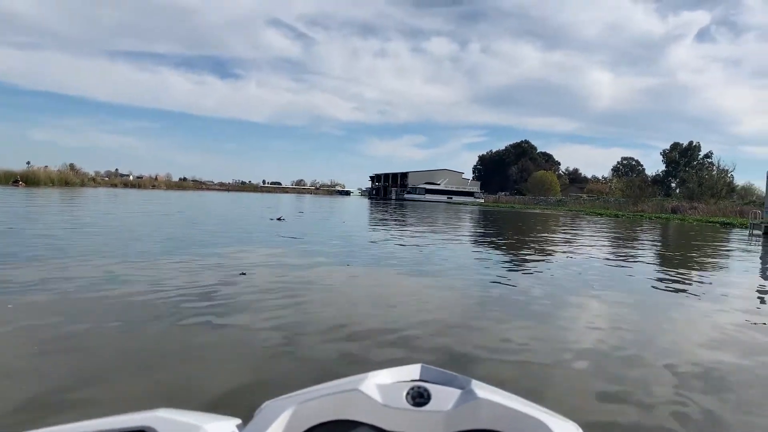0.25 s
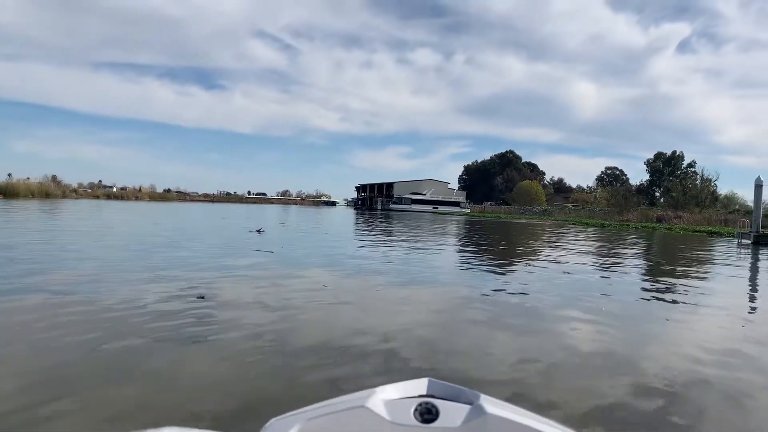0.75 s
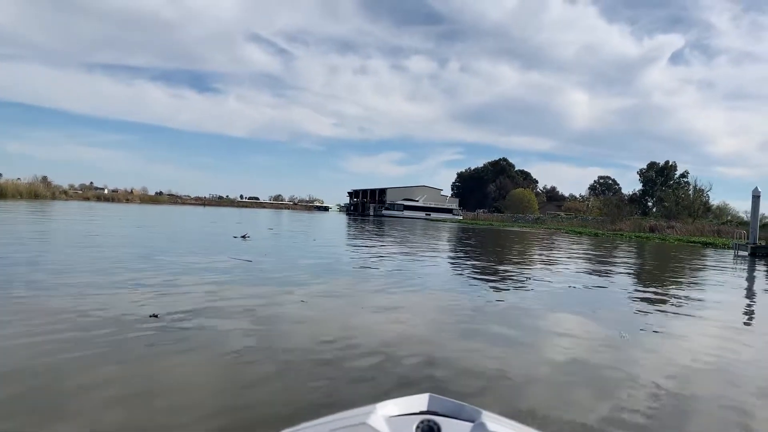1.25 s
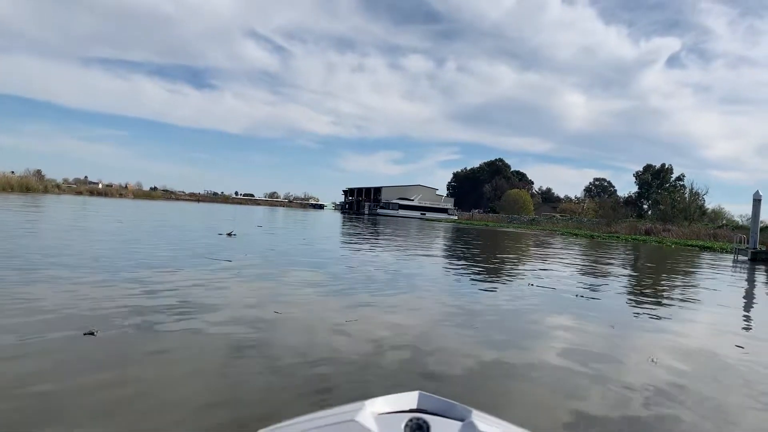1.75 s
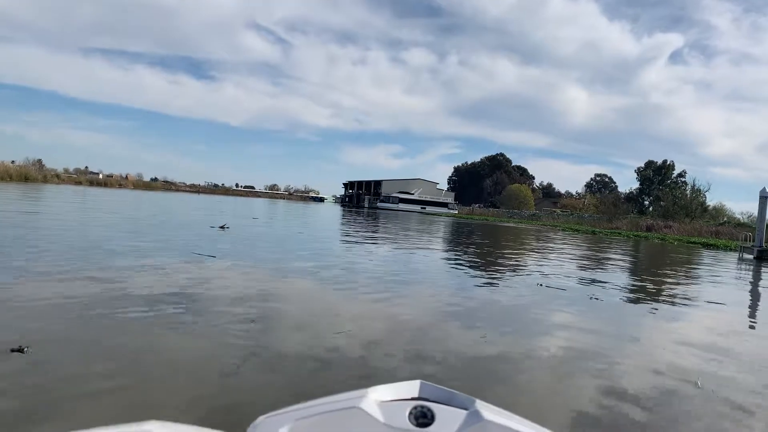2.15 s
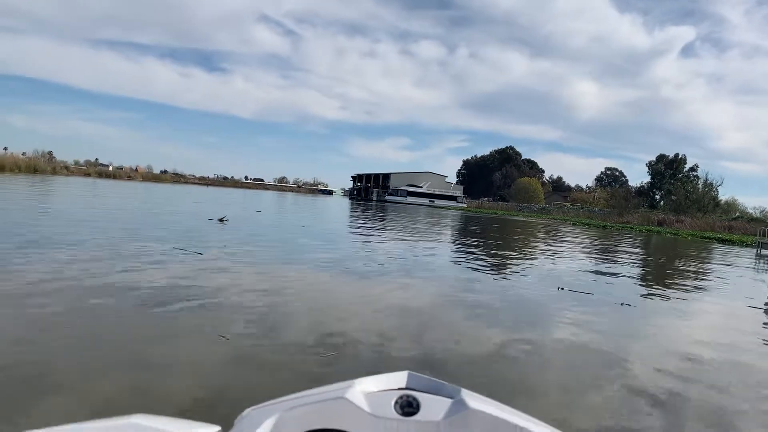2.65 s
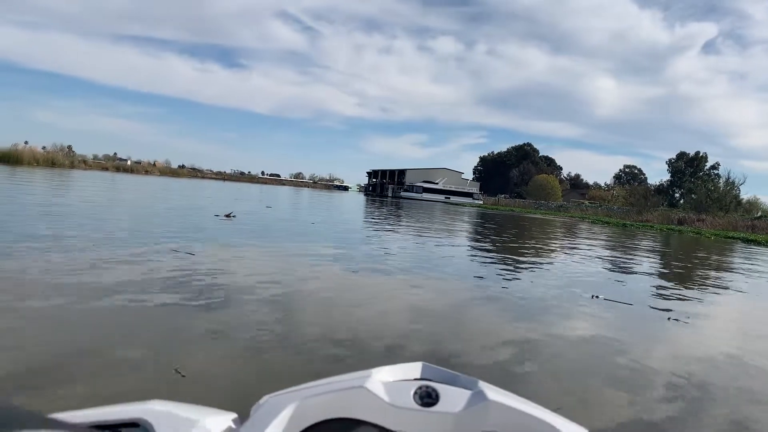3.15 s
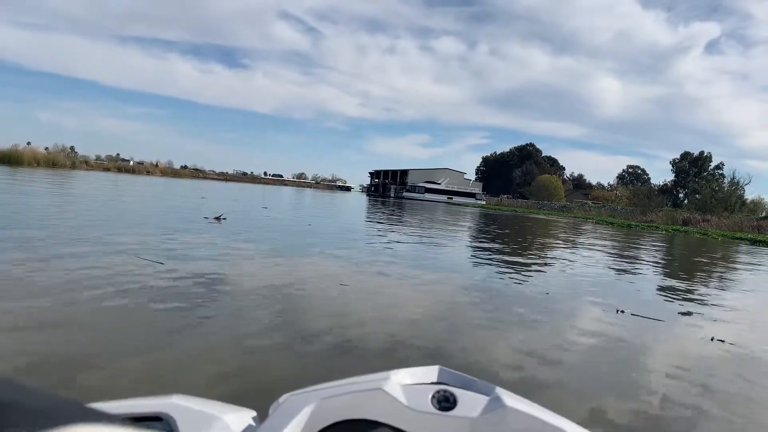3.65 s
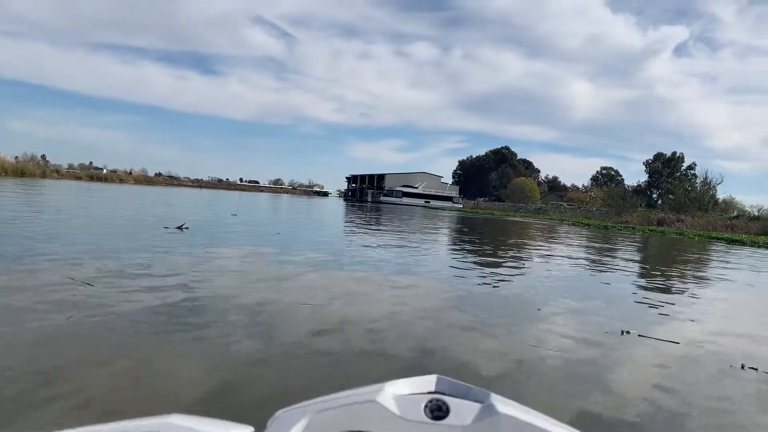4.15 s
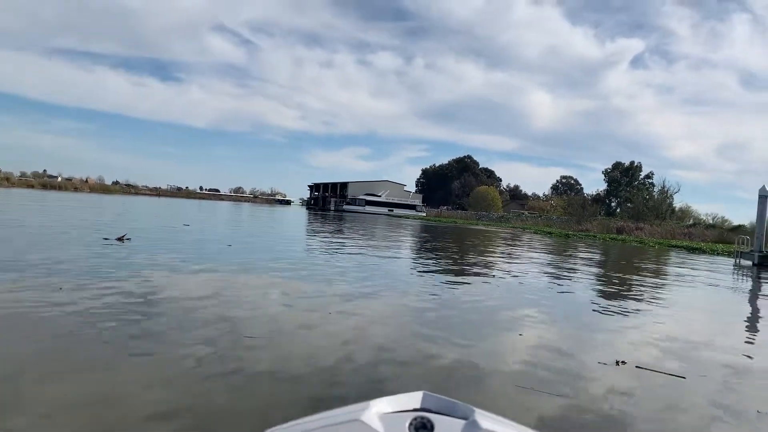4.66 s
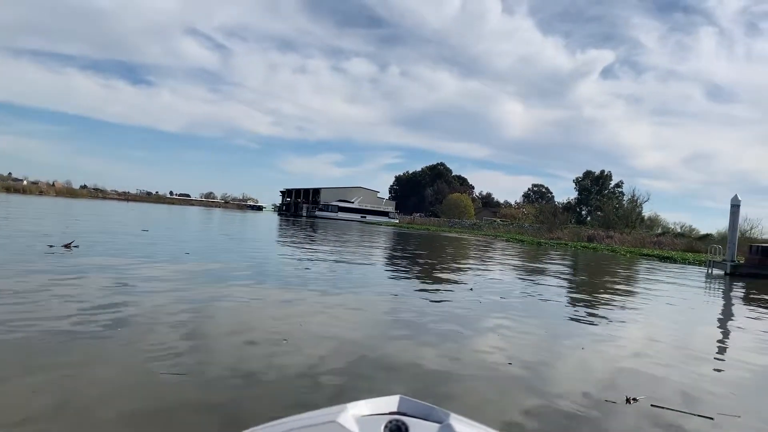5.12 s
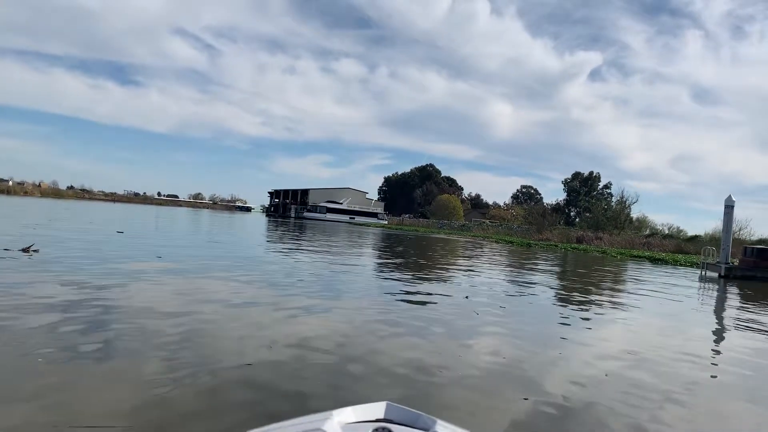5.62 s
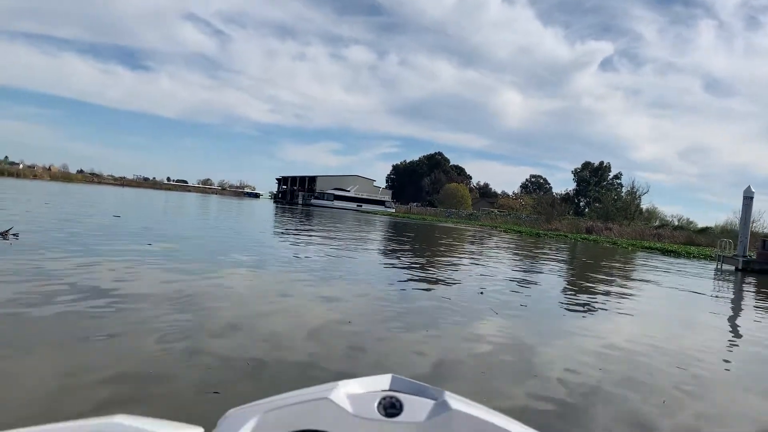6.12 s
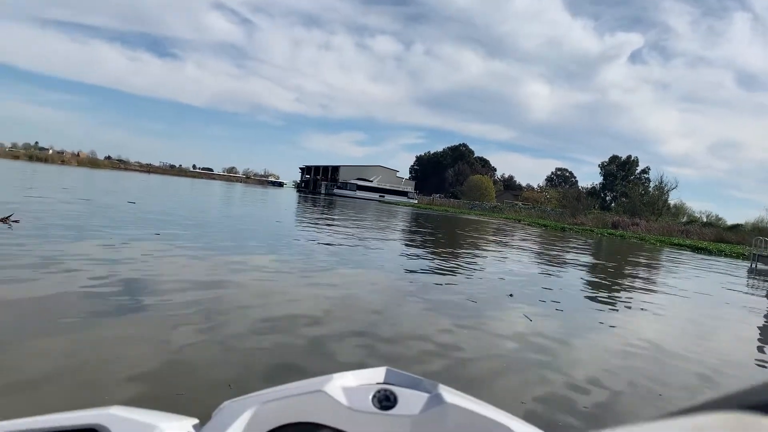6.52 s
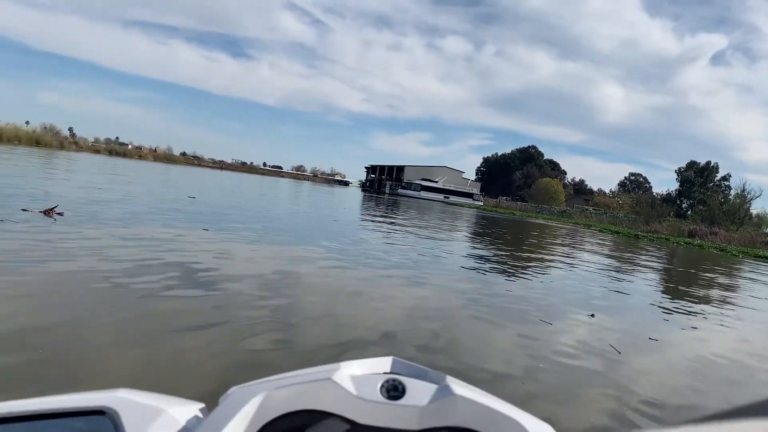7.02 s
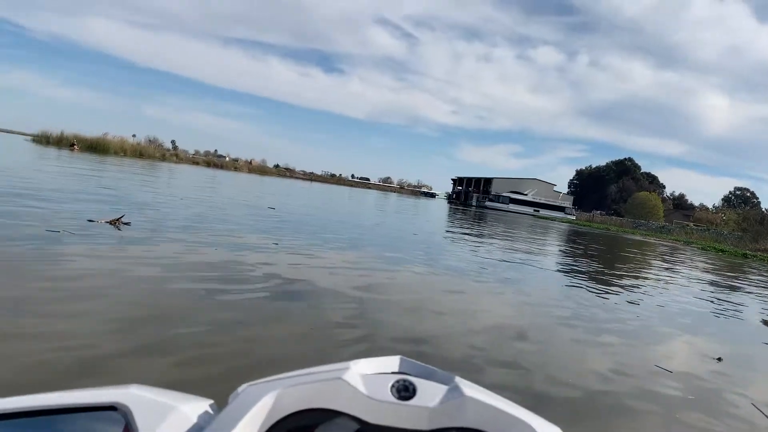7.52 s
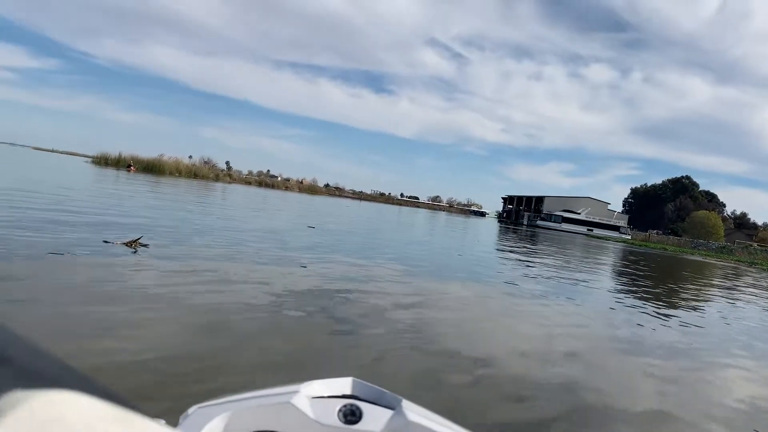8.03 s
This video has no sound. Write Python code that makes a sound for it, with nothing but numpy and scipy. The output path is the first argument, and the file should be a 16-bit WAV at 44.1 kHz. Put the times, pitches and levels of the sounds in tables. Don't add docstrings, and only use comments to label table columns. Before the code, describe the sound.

A small watercraft engine idles with a low, uneven, hollow boom and wet exhaust gurgle while water hisses and trickles along the hull.

```python
import sys
import numpy as np
from scipy import signal
from scipy.fft import rfft, irfft, next_fast_len
from scipy.io import wavfile
from scipy.ndimage import uniform_filter1d, map_coordinates

SR = 44100
rng = np.random.default_rng(int(sys.argv[2]) if len(sys.argv) > 2 else 0)


def persist_wave(psi):
    counts = np.round(np.clip(psi, -1, 1) * 32767).astype(np.int16)
    wavfile.write(sys.argv[1], SR, np.atleast_2d(counts).T)


def field_ratio(decibels):
    return 10 ** (np.asarray(decibels, dtype=float) / 20)


N = 365128

# (time [s], length [s], start pitch [Hz], end pitch [Hz], level [dB])
BIRD_PEEPS = [
    (4.785, 0.03, 5300, 5160, -50),
    (5.44, 0.027, 5280, 5125, -52),
    (7.576, 0.01, 3000, 3220, -44),
    (7.59, 0.03, 3237, 3080, -37.5),
]

# (frequency [Hz], density [dB per Hz])
WASH_COLOUR = [(300, -39), (500, 3), (1100, -3.5), (1500, -9.5), (1900, -11.5), (3000, -18), (6000, -25),
               (7800, -32), (8100, -26.5), (9500, -28), (10300, -32.5), (11500, -35.5), (13500, -41),
               (14300, -42.5), (15800, -44)]
# (time [s], level [dB])
WATER_FLOW = [(0.0, -41), (0.32, -44.5), (0.55, -41), (3.02, -41.5), (3.39, -42), (4.66, -41), (5.0, -42),
              (5.49, -40.5), (6.87, -43), (7.26, -40.5), (8.0, -42.5), (8.28, -39)]
# (time [s], half length [s], gain [dB])
SWASH_SWELLS = [
    (1.6, 0.32, 0.5),
    (3.3, .15, -0.5),
    (4.2, 0.16, -0.5),
    (6.4, .2, 1),
    (8.12, 0.14, -0.5),
]
# (time [s], half length [s], gain [dB])
SPRAY_LULLS = [
    (3.2, 0.34, -1),
    (5.75, 0.22, -3),
    (7.9, 0.44, -3),
]
# (time [s], length [s], start pitch [Hz], end pitch [Hz], level [dB])
HULL_SLAPS = [
    (5.67, 0.069, 275, 261, -14.5),
    (1.9, 0.084, 73, 55, -21),
]

# (time [s], peak level [dB], main mode [Hz])
SEAT_TAPS = [
    (1.068, -34, 2300),
    (2.3406, -35, 2500),
    (4.4715, -39, 5200),
    (4.4718, -37, 3300),
    (4.563, -42, 5270),
    (7.184, -40, 5200),
]

# (time [s], peak level [dB])
PANEL_TICKS = [(0.2942, -46), (0.3393, -51), (0.4687, -50.5), (0.5658, -45), (0.7262, -44.5), (0.8815, -37),
               (0.9133, -48), (1.1313, -43), (1.4065, -40), (1.511, -39), (1.748, -42.5), (1.8832, -39.5),
               (1.934, -42.5), (1.9699, -51), (1.989, -46.5), (2.0313, -43), (2.0916, -45.5), (2.1876, -43),
               (2.3819, -40), (2.5583, -46), (2.5975, -47), (2.8873, -44.5), (2.9277, -43), (3.7423, -46),
               (4.471, -30.5), (4.492, -36), (4.5096, -43), (4.5298, -39.5), (4.6895, -44.5), (4.9755, -41),
               (4.9824, -47.5), (4.9934, -49), (5.0113, -41), (5.3885, -49), (5.4365, -46), (5.6274, -46.5),
               (6.2153, -43), (6.2985, -45.5), (6.3593, -40), (6.4377, -45), (6.9964, -45.5), (7.0074, -44),
               (7.0503, -45.5), (7.0907, -42.5), (7.1544, -42.5), (7.218, -43), (7.272, -51.5),
               (7.2812, -44.5), (7.2923, -45), (7.3132, -43), (7.3454, -46), (7.4597, -52), (7.617, -49),
               (8.0472, -43.5), (8.1907, -44)]
# (time [s], peak level [dB])
CLIP_TICKS = [(0.6032, -46), (0.92, -47), (1.4073, -55.5), (1.8776, -53.5), (1.9883, -52), (2.558, -54.5),
              (2.5984, -49), (2.823, -51.5), (3.7914, -59.5), (3.8127, -38), (3.8326, -46), (3.8526, -33),
              (3.874, -36), (4.4702, -40), (4.92, -41), (4.9521, -50.5), (5.436, -44), (5.7817, -52.5),
              (6.298, -49), (6.3589, -48.5), (6.7849, -48.5), (6.997, -49), (7.0063, -45), (7.0498, -45),
              (7.154, -46), (7.1735, -59), (7.1861, -53), (7.2065, -48.5), (7.218, -46.5), (7.2284, -50),
              (7.2496, -45.5), (7.27, -49), (7.2809, -45.5), (7.2923, -42), (7.3142, -43), (7.335, -44),
              (7.3442, -47), (7.3574, -44), (7.525, -53.5), (7.618, -53), (7.709, -57), (8.038, -53),
              (8.1688, -49.5)]
# (frequency [Hz], level [dB], t60 [s], left over right [dB])
PANEL_MODES = [(2600, -11, .004, 0.5), (3900, -14, .004, -5), (5000, -11.5, 0.0044, -2.5),
               (6100, -11.5, 0.0055, 2), (8420, -7, 0.0082, 4.5), (9300, -3, 0.0054, 5),
               (12800, -18, .004, 2)]
CLIP_MODES = [(3300, -13.5, .004, 1.5), (4860, -14, .004, 4.5), (7300, -11.5, .004, -1.5),
              (9000, -7.5, .004, -7), (10600, -11.5, .004, -4.5), (11800, -5.5, .004, -1),
              (12900, -4, .004, -1), (13700, -4, .004, -1), (15000, -15, .003, -0.5)]

# (frequency [Hz], half width [Hz], level [dB rms])
INTAKE_BANDS = [(1350, 110, -57), (1130, 90, -57)]
# (time [s], half length [s], gain [dB])
INTAKE_SWELLS = [
    (.55, .3, 1),
    (1.75, .2, 5),
    (2.6, .15, 4),
    (3.35, .12, 10),
    (4.25, .3, 4),
    (5.7, .6, 5),
    (6.9, .3, 3),
]
# (frequency [Hz], level [dB rms], fade start [s])
WHINE_TONES = [(1115, -57.5, 8.5), (1678, -51.5, 5.6)]
# (time [s], half length [s], gain [dB])
WHINE_SWELLS = [(.1, .1, 1), (.45, .25, 1), (.85, .2, 3.5), (1.1, .08, -4), (1.4, .3, 4), (1.9, .3, 4),
                (2.25, 0.1, -4), (2.55, .2, 4), (2.9, .15, 6.5), (3.25, .12, 3), (3.6, .12, 4),
                (3.75, .06, -10), (4.1, 0.2, -4), (4.7, 0.44, 3.5), (5.3, .15, 2), (5.55, .12, -4),
                (5.95, 0.3, 4)]

# (frequency [Hz], density [dB per Hz])
HULL_COLOUR = [(13, -29.5), (22, -23), (58, -6), (107, -9.5), (193, -3), (243, -3.5), (392, -16),
               (467, -14.5), (555, -36.5), (700, -33), (910, -58), (1540, -120)]
# (time [s], half length [s], gain [dB])
OUTLET_DIPS = [
    (.4, 0.12, -0.5),
    (.9, 0.31, 4.5),
    (2.4, 1, 3),
    (3.4, 0.54, 1),
    (4.3, 0.87, 4.5),
    (5.8, 0.72, 4),
    (6.75, 0.2, 3.5),
    (7.8, 0.56, 4),
]

# (time [s], firing rate [Hz], load [dB], exhaust depth favouring order 4 over 5 [dB],
# hull shake [dB])
ENGINE_COURSE = [(0, 50.7, -15, -1.5, -21.5), (.25, 52.44, -24.5, -2.5, -24.5), (.55, 51.26, -19, 0.5, -20),
                 (1.0, 52.16, -24, 0.5, -23.5), (1.36, 50.98, -20, -2, -25), (2.0, 49.12, -17, -0.3, -27),
                 (2.9, 51.1, -21, -3, -22.5), (3.2, 49.62, -21, -3.5, -24.5), (3.85, 50.26, -22, 0, -24),
                 (4.13, 48.26, -21.5, 1, -22.5), (4.78, 50.55, -16.5, -1.5, -22),
                 (5.7, 46.3, -21, 2.5, -26), (5.9, 48.03, -20, 4, -27.5), (6.4, 47.24, -17, 0.5, -23.5),
                 (6.72, 48.66, -25, -4, -28), (7.05, 46.33, -18.5, 0, -22.5), (7.9, 48.84, -21, 2, -22),
                 (8.28, 46.92, -19.5, 0, -20.5)]
# (time [s], half length [s], rate change [Hz])
ENGINE_HUNTS = [(.75, .12, .4), (1.3, .08, -.5), (1.55, .12, .9), (1.68, .07, -.7), (1.85, .11, 1.1),
                (2.48, .3, -.8), (3.35, .1, .5), (5.45, .25, .7), (6.55, .1, -.5), (6.9, .12, -.8),
                (7.17, .15, 1), (7.55, .12, -.4), (8.14, .1, -.7)]
# (time [s], loss of order 4 [dB], loss of order 5 [dB])
STUMBLES = [(.21, -1, 8.5), (1.221, 16.5, -2), (1.93, 21, 3), (2.67, 13, 2), (2.79, 15.5, -1),
            (3.02, 8, -1.5), (3.359, 6.5, -1), (3.74, 6.5, -6), (4.1, 19.5, 3), (4.151, -1.5, 20),
            (4.38, 18, 1), (5.76, 6.5, -10), (5.81, -3.5, 0), (7.59, 11.5, -4), (8.05, 17, -1)]
# (multiple of firing rate [ratio], level [dB rms])
WEAK_ORDERS = [(2 / 3, -35), (4 / 3, -34.5), (5 / 3, -45), (7 / 3, -42), (10 / 3, -41), (11 / 3, -39.5),
               (13 / 3, -38.5), (14 / 3, -41), (16 / 3, -40), (17 / 3, -39), (7, -42)]
# (multiple of firing rate [ratio], level [dB rms])
TOP_ORDERS = [(26 / 3, -47.5), (9, -52.5), (28 / 3, -47.5), (29 / 3, -50), (10, -45)]
# (time [s], half length [s], gain [dB])
SECOND_SWELLS = [
    (4.3, 0.31, 5),
    (5.5, 0.53, 12.5),
    (7.3, .3, 4),
]
# (time [s], half length [s], gain [dB])
THIRD_SWELLS = [(.5, 0.49, -2), (1.3, 0.32, 4), (2.2, 0.29, 0), (2.85, 0.17, 1), (3.25, 0.2, 4.5),
                (3.7, 0.34, -6), (4.4, 0.48, -3), (5.0, .2, -4), (5.4, 0.23, 7), (6.3, .3, -2),
                (7.4, 0.74, 4.5)]
FOURTH_SURGES = [(.36, 0.23, 8), (.7, .1, -4.5), (1.05, 0.23, 7.5), (1.47, .14, 4.5), (1.8, 0.18, 4),
                 (2.15, .15, -4), (2.55, .1, 2), (3.15, .1, 2), (3.42, .1, 5), (3.66, .25, 0.5),
                 (4.24, 0.13, 9), (4.55, .12, -3), (4.8, .12, 3.5), (5.1, .15, -2), (5.5, .15, 1),
                 (6.0, 0.24, 1.5), (6.3, .15, 1), (6.55, .1, 1), (7.2, .15, 2), (7.55, .1, -4.5),
                 (7.78, 0.29, 7.5), (8.2, .1, -3)]
FIFTH_SURGES = [(.28, 0.14, 3), (.65, 0.1, 4), (.95, 0.15, 3), (1.25, .1, -0.5), (1.7, .15, 2.5),
                (2.25, 0.16, -1), (2.5, 0.1, 2), (3.3, 0.11, -4), (3.7, 0.18, 0), (4.3, .15, -1),
                (4.75, 0.12, -2), (5.1, 0.16, 3.5), (5.75, .08, 0), (6.15, .15, 2.5), (6.9, 0.13, -1),
                (7.15, .1, 3), (7.7, 0.33, 1)]
SIXTH_SURGES = [(.1, 0.11, 2.5), (.3, 0.13, -7.5), (.7, 0.17, 2.5), (1.27, 0.094, 6), (2.05, .2, 3),
                (2.4, 0.16, -7), (3.0, .2, -12), (3.75, .4, 1), (4.05, .1, 6), (5.1, .2, 5),
                (5.45, 0.13, 5.5), (6.15, .1, 2), (7.0, .25, 5), (7.4, .12, 6), (7.9, 0.33, -4)]
TOP_SWELLS = [(.2, 0.14, 3), (.45, 0.17, -4), (.85, .2, -2), (1.2, 0.78, 0.5), (2.3, .3, 2),
              (3.2, 0.37, -5.5), (4.4, 0.43, 6), (5.8, 0.82, 2.5), (6.5, 0.18, 0), (6.85, .2, -6),
              (7.6, 1, -8.5)]

# (frequency [Hz], correlation [0 to 1])
PORT_LIKENESS = [(40, 0.97), (100, 0.87), (300, 1), (620, 0.045), (1400, 0.19), (7000, 0.095), (9500, 0.29),
                 (10500, 0.83), (14300, 0.32)]
# (frequency [Hz], left over right [dB])
PORT_BALANCE = [(60, 3.5), (200, 0.5), (1250, 1), (4200, -2), (7500, -0.5), (8300, 10.5), (10000, 6),
                (12000, -2)]
# (frequency [Hz], phase [rad])
PORT_LEAD = [(60, 0), (120, .11), (250, .23), (600, .5), (1210, .9), (1640, 2.2), (2930, 1), (4130, 4),
             (5770, 6.7), (8270, 5.8), (10300, 9.4), (11400, 9.8), (11800, 12.5), (13900, 12.6),
             (14250, 15.7), (14600, 18.85)]
# (frequency [Hz], gain [dB])
MIC_ROLLOFF = [(13300, 0), (13900, -6), (14600, -14), (15800, -18)]


def unit(x):
    return x / np.sqrt(np.mean(x ** 2) + 1e-20)


def along(points, hz):
    f, v = np.transpose(points)
    return np.interp(np.log(hz + 1), np.log(f + 1), v)


def curves(rows):
    times, *columns = np.transpose(rows)
    return [np.interp(np.arange(N) / SR, times, column) for column in columns]


def bumps(rows):
    t = np.arange(N) / SR
    return sum(gain * np.cos(np.pi / 2 * np.clip((t - s) / length, -1, 1)) ** 2 for s, length, gain in rows)


def wobble(rate):
    knots = rng.standard_normal(int(N * 60 / SR) + 4)
    return map_coordinates(knots, [np.arange(N) * min(rate, 60) / SR])


def filtered(x, response):
    m = next_fast_len(N + SR // 2)
    return irfft(rfft(x, m) * response(np.fft.rfftfreq(m, 1 / SR)), m)[..., :N]


def spread(pair, spectrum):
    def mid_and_side_gains(hz):
        turn = np.arccos(np.clip(along(PORT_LIKENESS, hz), -1, 1)) / 2
        return field_ratio(along(spectrum, hz)) * [np.cos(turn), np.sin(turn)]

    mid, side = filtered(pair, mid_and_side_gains)
    return unit(np.array([mid + side, mid - side]))


def tone(turns, level_db, drift, sway_db, pace=12):
    port_phase = 0.18 * np.array([wobble(1.9), wobble(5.5)])
    level = np.sqrt(2) * field_ratio(level_db + sway_db * wobble(9))
    return level * np.sin(2 * np.pi * turns + drift * wobble(pace) + port_phase)


def glides(rows):
    out = np.zeros(N)
    for s, length, start_hz, end_hz, db in rows:
        t = np.arange(round(length * SR)) / SR
        turns = start_hz * t + (end_hz - start_hz) * t * t / length / 2
        envelope = field_ratio(db) * np.hanning(len(t)) ** .5
        out[round(s * SR):][:len(t)] += envelope * np.sin(2 * np.pi * turns)
    return out


def bird_peeps():
    return glides(BIRD_PEEPS)


def patchy_hiss(firing_count):
    z = signal.stft(rng.standard_normal((2, N)), nperseg=512)[2]
    patches = uniform_filter1d(rng.standard_normal(z.shape[1:]), size=5, axis=0)
    patches = uniform_filter1d(patches, size=4, axis=1)
    hiss = signal.istft(z * field_ratio(2.18 * unit(patches)), nperseg=512)[1][:, :N]
    shake_db = np.cos(2 * np.pi * firing_count) + 0.29 * wobble(7.8) + 0.37 * wobble(30)
    return hiss * field_ratio(shake_db)


def drops_and_bubbles():
    place, pitch, size, near = rng.random((2500, 4)).T[..., None]
    t = np.arange(300) / SR
    hz = 1600 * 5 ** pitch
    life = 5 / hz
    rising = 1 + 0.092 * t / life
    ring = np.sin(2 * np.pi * hz * t * rising) * t / life * np.exp(-3 * t / life)
    ring *= field_ratio(-2.2 * np.log(1.002 - size))
    at = (place * N).astype(int) + np.arange(300)
    ports = [np.bincount(at.ravel(), (ring * gain).ravel(), N + 500)[:N] for gain in (near, 1 - near)]
    return np.array(ports)


def wash(firing_count):
    mix = unit(patchy_hiss(firing_count)) + 0.071 * unit(drops_and_bubbles())
    water = spread(mix, WASH_COLOUR)
    spray = filtered(water, lambda hz: hz > 7900)
    flow_db, = curves(WATER_FLOW)
    fade_db = 0.15 * (np.arange(N) - N / 2) / SR
    spray_db = -59.5 + (flow_db - flow_db.mean()) - fade_db + bumps(SPRAY_LULLS)
    body_db = flow_db + 4.0 + bumps(SWASH_SWELLS)
    return field_ratio(body_db) * (water - spray) + field_ratio(spray_db) * unit(spray)


def hull_slaps():
    return glides(HULL_SLAPS)


def seat_taps():
    out, t = np.zeros(N), np.arange(SR // 20) / SR
    t60_s, attack_s = 0.004, 0.00026
    for s, db, hz in SEAT_TAPS:
        partials = sum(np.sin(2 * np.pi * ratio * hz * t) for ratio in (0.56, .74, .88, 1, 1.17))
        envelope = field_ratio(db - 60 * t / t60_s) * (1 - np.exp(-t / attack_s))
        out[round(s * SR):][:len(t)] += 2 * envelope * partials
    return out


def rattle(ticks, modes, gain_db):
    out, t = np.zeros((2, N + SR)), np.arange(SR // 25) / SR
    hz, level_db, t60_s, pan_db = np.transpose(modes)[..., None]
    lag_s, buzz_db, buzz_t60_s = .0015, -13.5, .03
    for s, db in ticks:
        level_chance, pitch_chance = rng.standard_normal((2, len(modes), 1))
        grit = uniform_filter1d(rng.standard_normal((len(modes), len(t))), size=12, axis=1)
        buzz = field_ratio(buzz_db - 60 * t / buzz_t60_s) * 2 * grit
        envelope = field_ratio(level_db + 2 * level_chance) * (field_ratio(-60 * t / t60_s) + buzz)
        rings = envelope * np.sin(2 * np.pi * hz * (1 + 0.044 * pitch_chance) * t)
        ports = np.array([(rings * field_ratio(side * pan_db)).sum(axis=0) for side in (.5, -.5)])
        out[:, round((s + lag_s) * SR):][:, :len(t)] += field_ratio(db + gain_db) * ports
    return out[:, :N]


def trim():
    panel = rattle(PANEL_TICKS, PANEL_MODES, gain_db=3.5)
    clip = rattle(CLIP_TICKS, CLIP_MODES, gain_db=5)
    return panel + clip


def pump_intake():
    bands = 0
    for hz, width, db in INTAKE_BANDS:
        noise = rng.standard_normal((2, N))
        band = filtered(noise, lambda f: 1 / (1 + ((f - hz) / width) ** 4))
        bands = bands + field_ratio(db) * unit(band)
    return field_ratio(bumps(INTAKE_SWELLS)) * bands


def pump_whine():
    firing_hz, load_db, _, _ = curves(ENGINE_COURSE)
    slow_speed = uniform_filter1d(firing_hz, size=SR) / 50
    whine = 0
    for hz, db, fade_s in WHINE_TONES:
        turns = np.cumsum(hz * slow_speed ** 0.34) / SR
        fade_db = 9 * np.clip(np.arange(N) / SR - fade_s, 0, 2)
        level_db = db - fade_db + 0.1 * (load_db - load_db.mean()) + bumps(WHINE_SWELLS) + .7 * wobble(4)
        whine = whine + tone(turns, level_db, drift=1.5, sway_db=1.2, pace=45)
    return whine


def exhaust_gurgle(firing_count):
    load_db = curves(ENGINE_COURSE)[1]
    firings = np.zeros((2, N))
    at = np.flatnonzero(np.diff(np.floor(firing_count)))
    firings[:, at] = rng.standard_normal((2, len(at)))
    gurgle = unit(firings) + 2.54 * rng.standard_normal((2, N))
    level_db = -24.3 + .14 * (load_db - load_db.mean()) + bumps(OUTLET_DIPS) + .9 * wobble(4.9)
    return field_ratio(level_db) * spread(gurgle, HULL_COLOUR)


def stumble_losses():
    t, half_length_s = np.arange(N) / SR, 0.022
    losses = np.zeros((2, N))
    for s, fourth_db, fifth_db in STUMBLES:
        dip = np.clip(1 - np.abs(t - s) / half_length_s / 2, 0, 1)
        losses += np.array([[fourth_db], [fifth_db]]) * dip
    return losses


def engine_orders(firing_count):
    firing_hz, load_db, depth_db, shake_db = curves(ENGINE_COURSE)
    faster_hz = firing_hz - firing_hz.mean()
    fourth_loss, fifth_loss = stumble_losses()
    first_db = shake_db + 1.1 * wobble(5)
    second_db = bumps(SECOND_SWELLS) - 39.5
    third_db = -30.5 + 1.5 * faster_hz + bumps(THIRD_SWELLS) + wobble(11)
    fourth_db = load_db - 3 + depth_db + bumps(FOURTH_SURGES) - fourth_loss + wobble(18)
    fifth_db = load_db - 2 - depth_db + bumps(FIFTH_SURGES) - fifth_loss + .4 * wobble(6)
    sixth_db = -33 + bumps(SIXTH_SURGES)
    boom = tone(firing_count, first_db, drift=.15, sway_db=.5)
    boom += tone(2 * firing_count, second_db, drift=1.0, sway_db=3.0)
    boom += tone(3 * firing_count, third_db, drift=.35, sway_db=1)
    boom += tone(4 * firing_count, fourth_db, drift=.35, sway_db=.7, pace=16)
    boom += tone(5 * firing_count, fifth_db, drift=.25, sway_db=.55, pace=16)
    boom += tone(6 * firing_count, sixth_db, drift=.75, sway_db=2)
    for order, db in WEAK_ORDERS:
        boom += tone(order * firing_count + rng.random(), db, drift=0.096 * order, sway_db=2.55)
    top_gain_db = bumps(TOP_SWELLS) - 1.5 * faster_hz
    for order, db in TOP_ORDERS:
        boom += tone(order * firing_count, db + top_gain_db, drift=0.14 * order, sway_db=3.0)
    return boom


def scene():
    firing_count = np.cumsum(curves(ENGINE_COURSE)[0] + bumps(ENGINE_HUNTS)) / SR
    water = wash(firing_count) + hull_slaps()
    pump = pump_intake() + pump_whine()
    engine = exhaust_gurgle(firing_count) + engine_orders(firing_count)
    return bird_peeps() + water + seat_taps() + trim() + pump + engine


def low_pass(x):
    return signal.sosfilt(signal.butter(12, 15800, fs=SR, output="sos"), x)


def record(dry):
    half = np.array([[.5], [-.5]])

    def port_response(hz):
        gain_db = half * along(PORT_BALANCE, hz) + along(MIC_ROLLOFF, hz)
        return field_ratio(gain_db) * np.exp(1j * half * along(PORT_LEAD, hz))

    ports = filtered(dry, port_response)
    ports = ports / (1 + np.abs(ports / 0.74) ** 6) ** (1 / 6)
    return low_pass(ports)


dry = scene()
out = record(dry)
persist_wave(out)
```